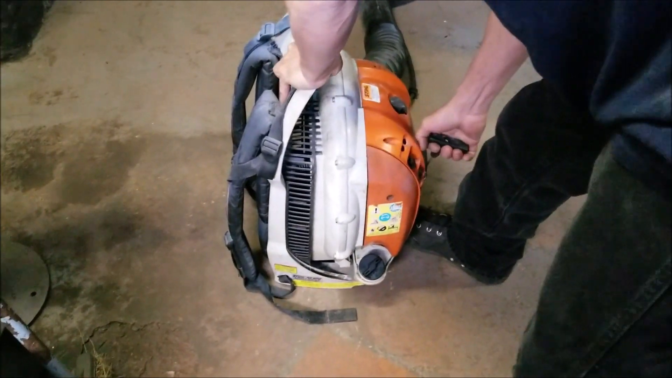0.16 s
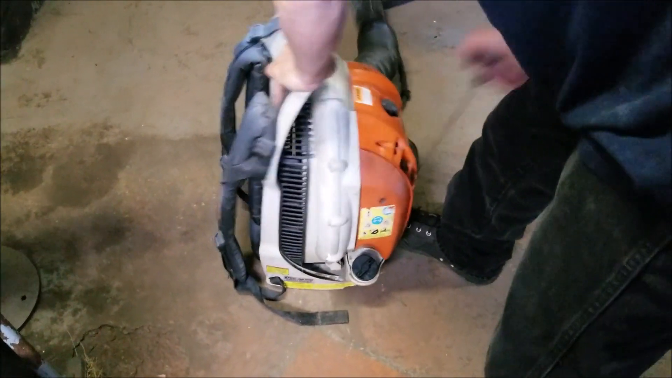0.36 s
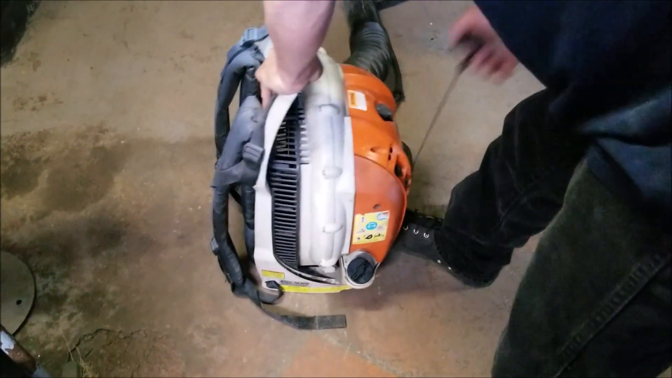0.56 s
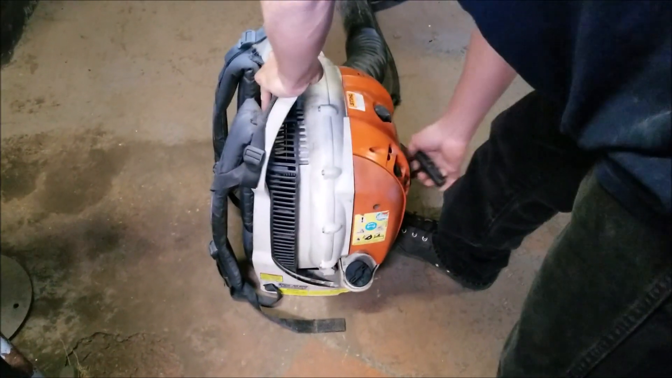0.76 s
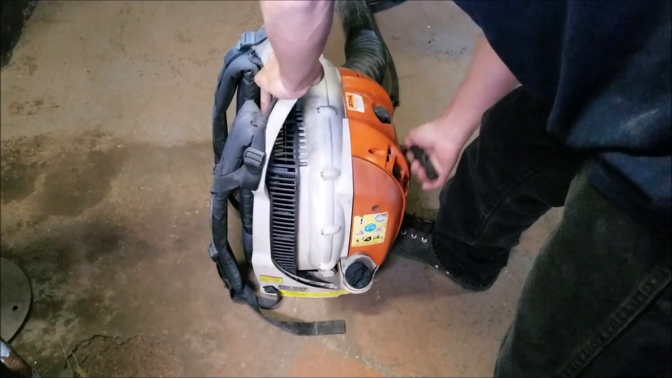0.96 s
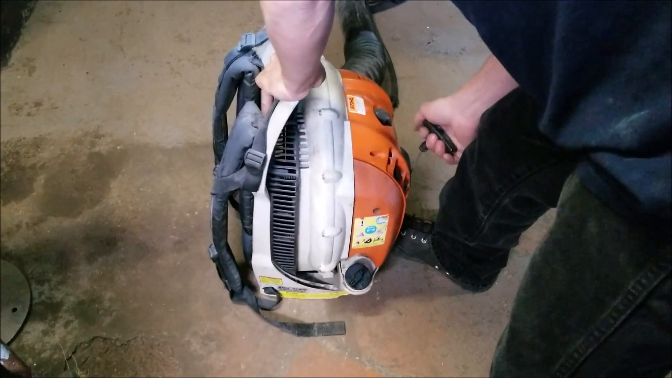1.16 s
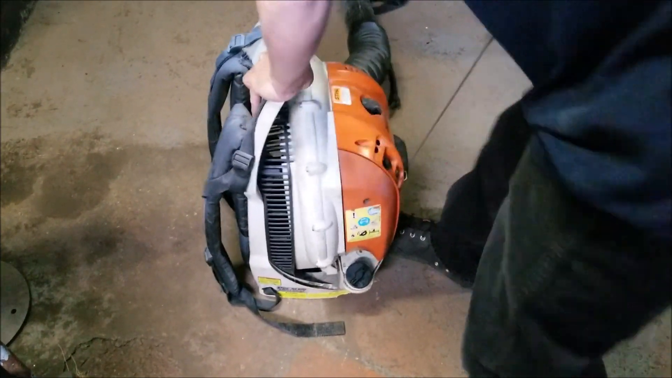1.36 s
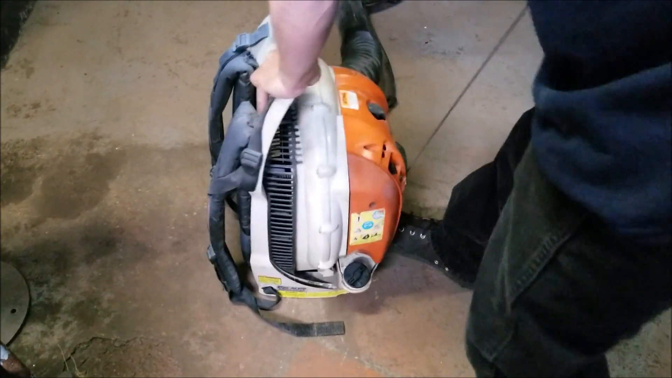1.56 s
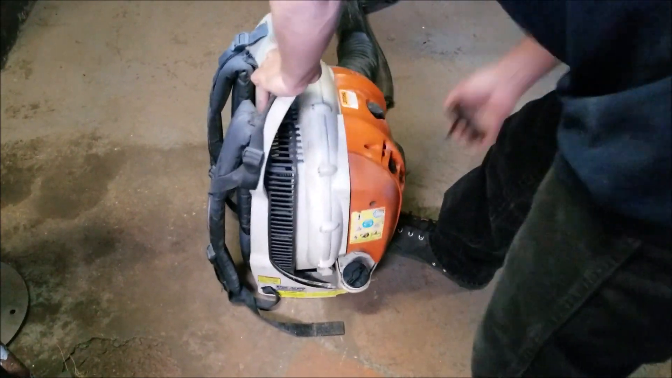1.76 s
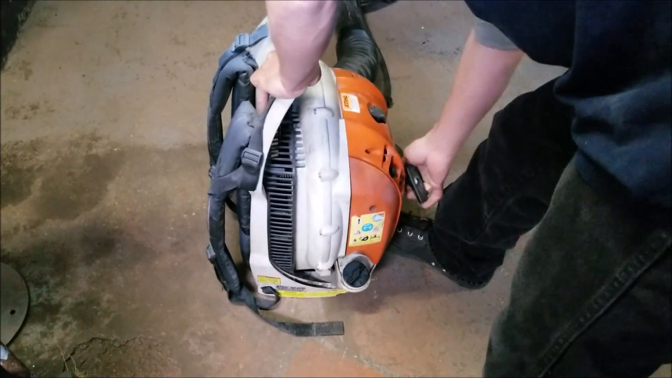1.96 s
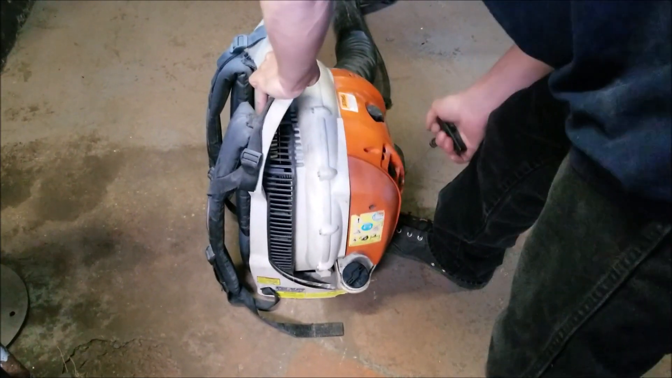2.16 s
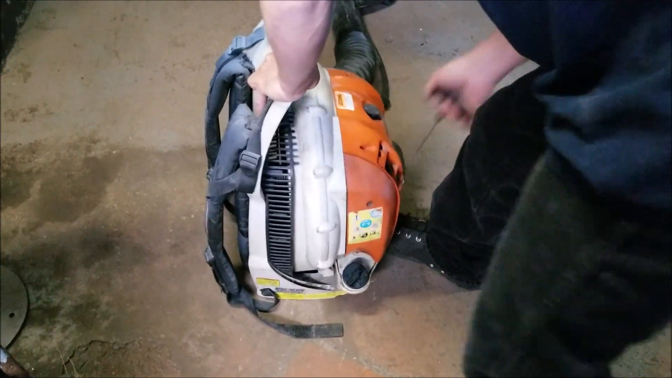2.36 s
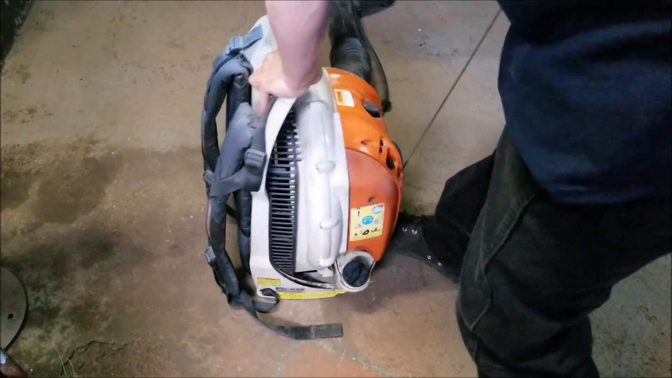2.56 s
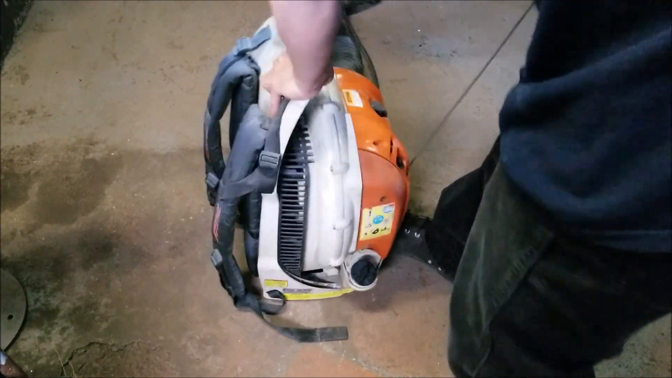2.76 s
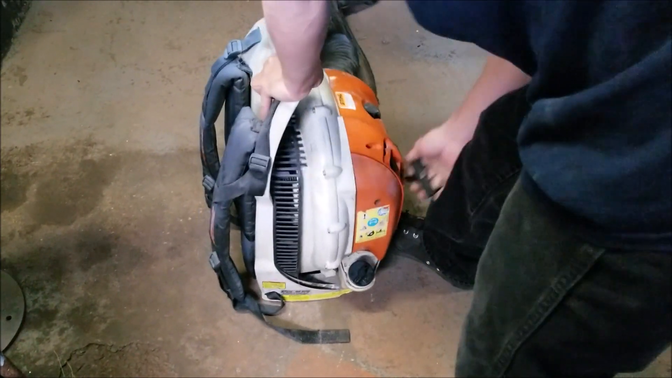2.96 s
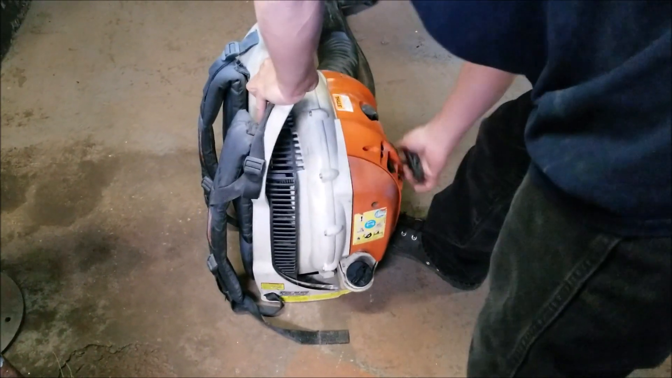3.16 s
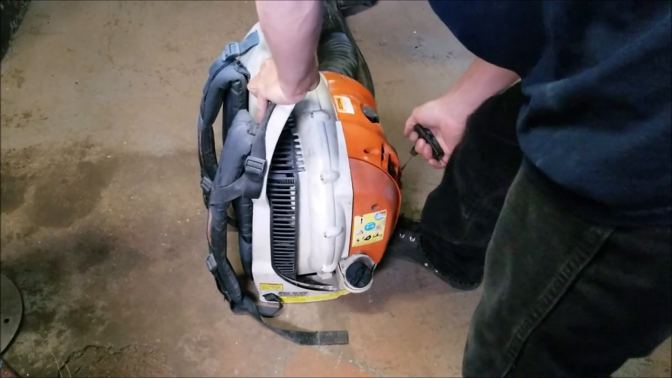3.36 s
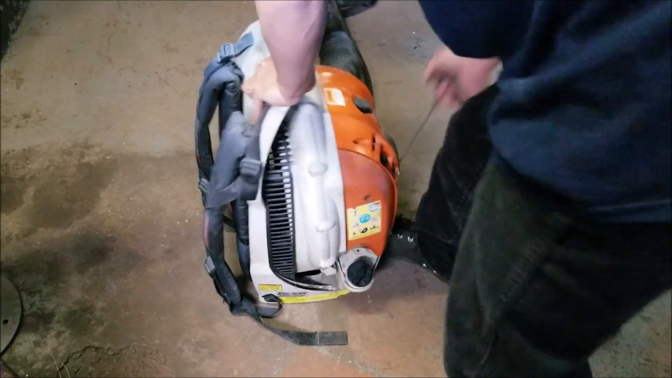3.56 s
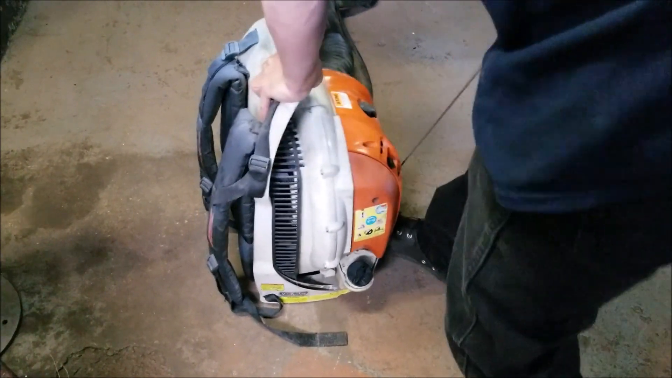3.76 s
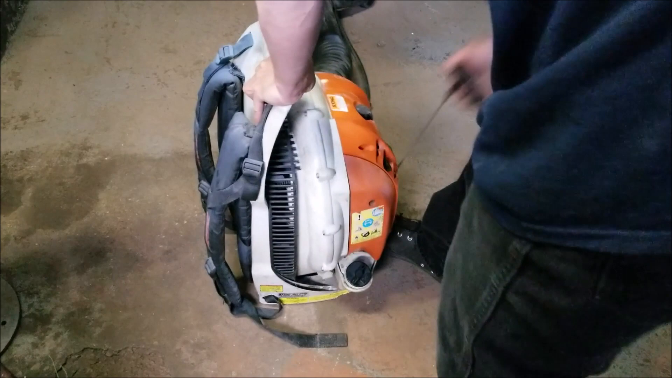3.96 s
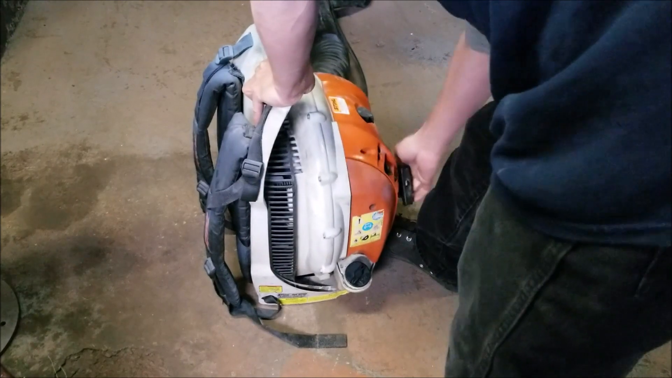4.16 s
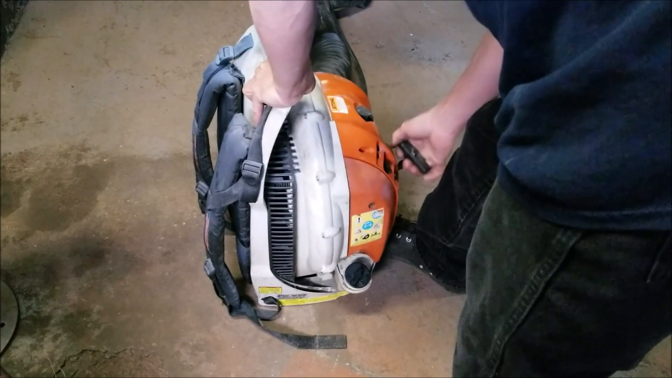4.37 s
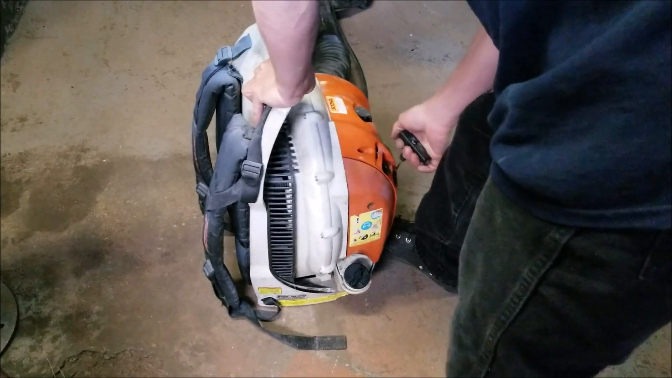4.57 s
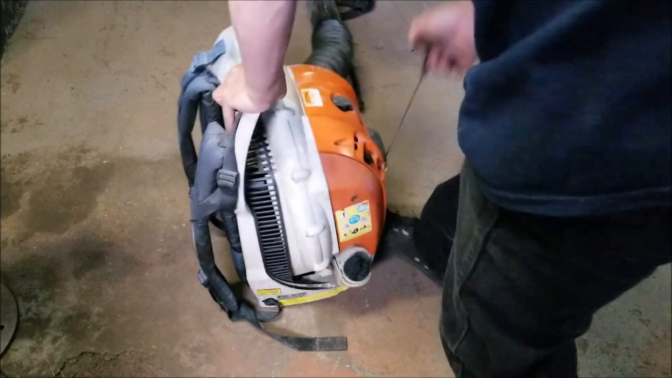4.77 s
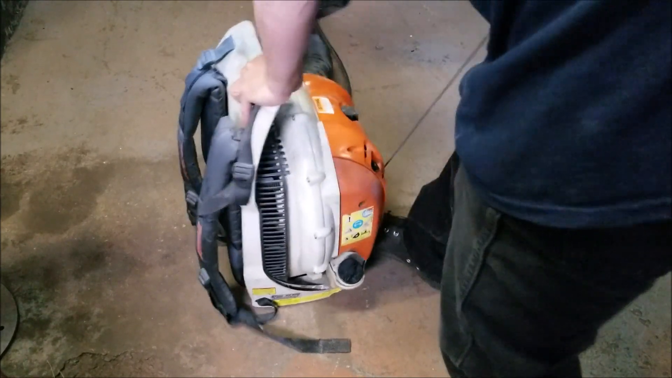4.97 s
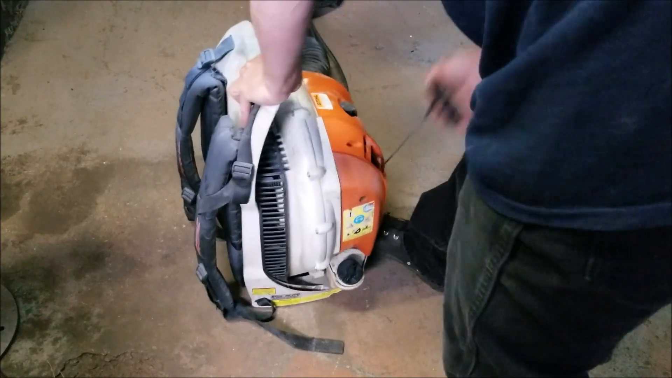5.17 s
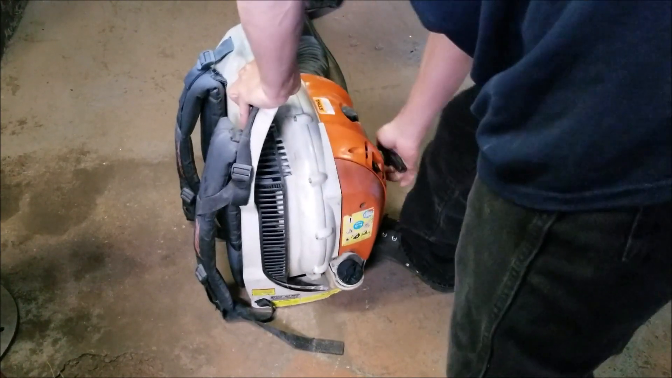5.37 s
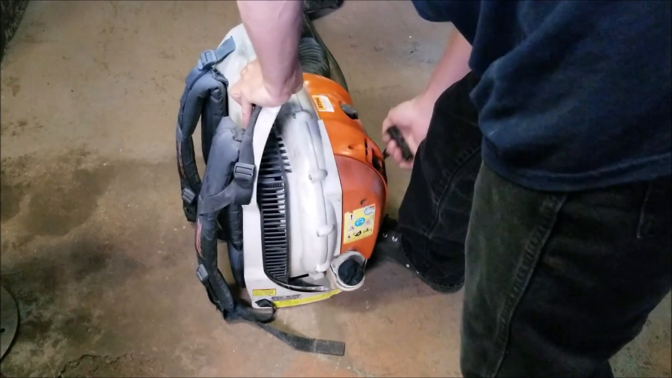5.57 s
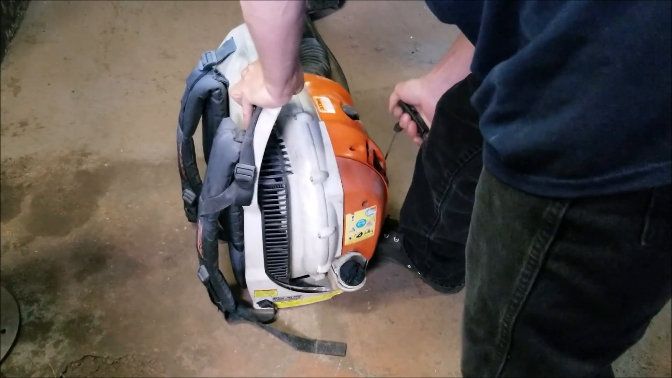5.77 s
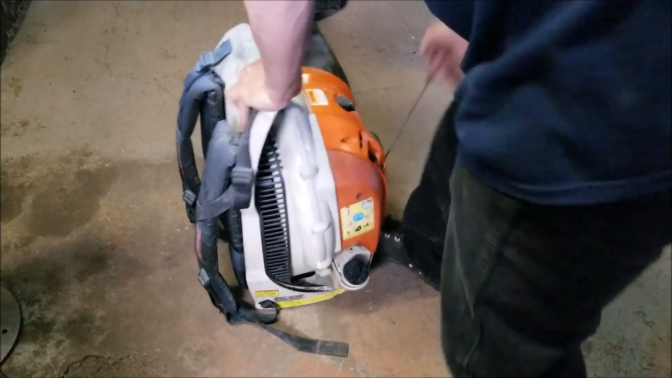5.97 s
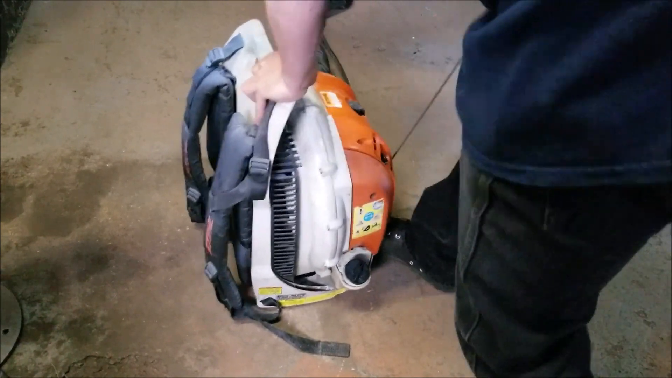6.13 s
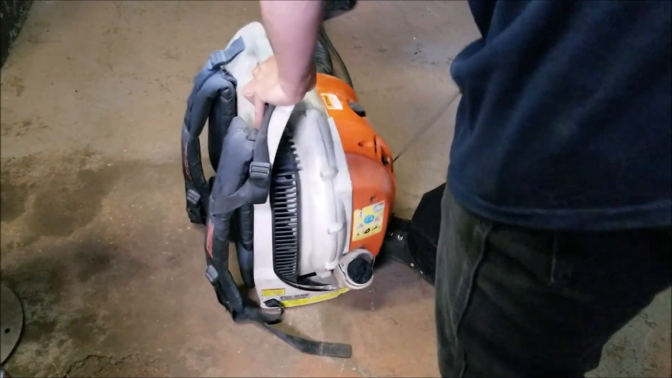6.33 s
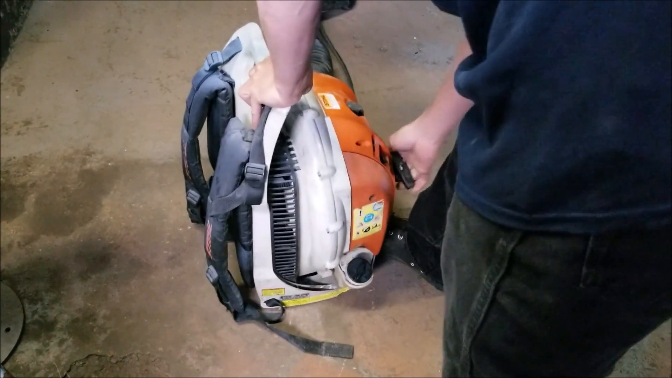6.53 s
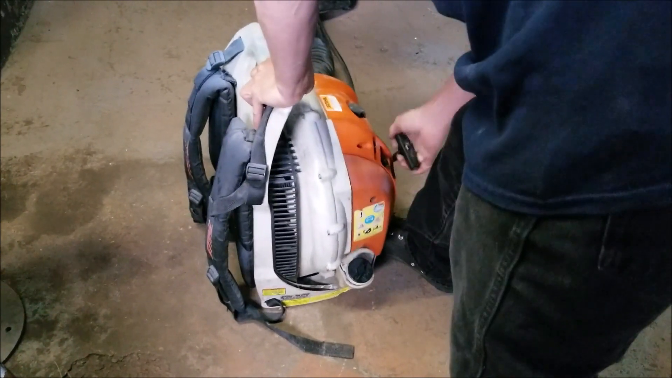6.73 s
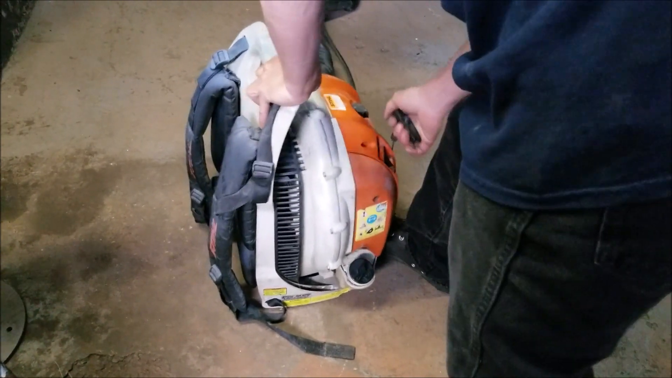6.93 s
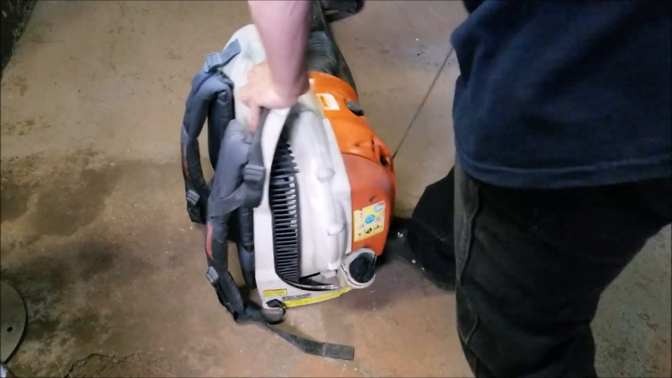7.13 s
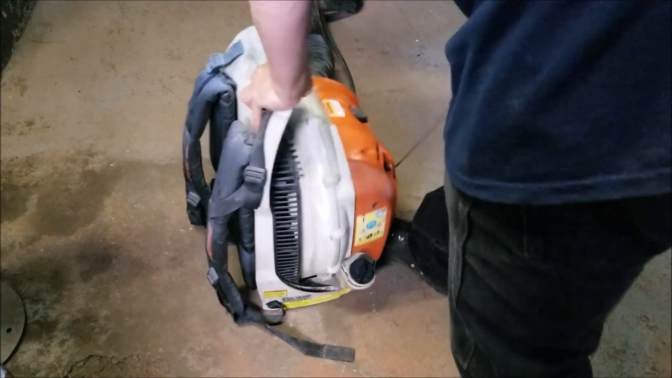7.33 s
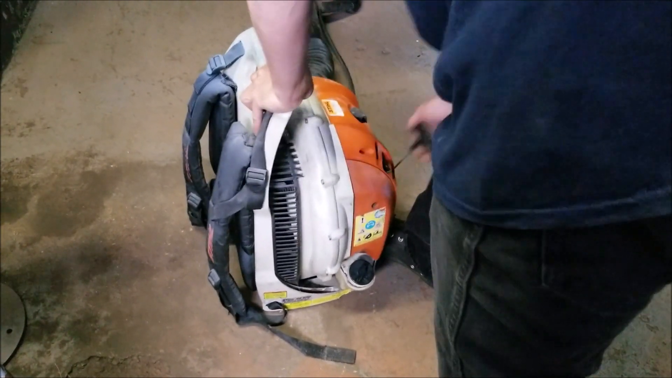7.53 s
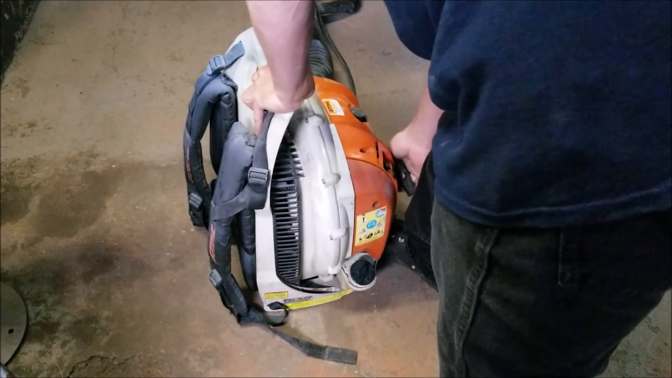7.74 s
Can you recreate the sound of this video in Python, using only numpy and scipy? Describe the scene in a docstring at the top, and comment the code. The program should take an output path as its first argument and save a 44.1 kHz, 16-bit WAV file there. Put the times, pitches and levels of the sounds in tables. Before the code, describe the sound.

In a hard-walled workshop, the starter cord of a two-stroke backpack blower is pulled seven times, about once a second. Each pull opens with a hollow clunk and a low gulp of air, then the cord rasps out while the piston knocks the plastic housing. The fan coasts as the cord rewinds, and the handle usually bumps home. The engine never fires. It sits slightly left of the microphone.

```python
"""A hard-walled workshop; a two-stroke backpack blower stands a little left of the microphone.
Its recoil starter is pulled seven times. A pull opens with the clunk of the pawls and a gulp of air;
then the cord rasps off its pulley while the piston knocks the plastic housing and small parts clack.
The fan coasts as the spring rewinds the cord, the handle bumps home and the cavities hum on.
The walls ring briefly, down to a faint hush. The engine never fires."""
import sys
import numpy as np
from scipy import signal
from scipy.fft import rfft, irfft, next_fast_len
from scipy.io import wavfile
from scipy.ndimage import map_coordinates

SR = 44100
rng = np.random.default_rng(int(sys.argv[2]) if len(sys.argv) > 2 else 0)


def master(y):
    """Save y as 16-bit WAV."""
    cut = np.clip(np.atleast_2d(y).T, -1, 1)
    pcm = np.round(cut * 32767)  # scale
    wavfile.write(sys.argv[1], SR, pcm.astype(np.int16))


N = 343980

# The pulls. Each row: start of the cord's run, slack time before it, stroke length and rewind length
# in seconds, then cord rasp, fan whirr, and the low and high note of the first gulp in dB.
PULLS = [(.336, .002, 0.13, 0.3, -38, -35, -37.5, -44), (1.403, .118, .19, .51, -29.5, -31.5, -28, -25),
         (2.488, 0.06, .23, 0.56, -32, -31, -35, -45), (3.677, .138, .17, .52, -31.5, -31.5, -30.5, -25),
         (4.779, .008, .17, .53, -32, -32, -38, -46), (6.046, 0.12, 0.18, 0.59, -30, -30, -23.5, -45),
         (7.105, 0.13, 0.2, .49, -32.5, -29.5, -32.5, -54)]
# Pawls catching the flywheel. Each row: start in seconds, level in dB, relative treble in dB,
# favoured ring in Hz.
PAWL_CATCHES = [(0.336, -11.5, -16, 584), (1.275, -17.5, -19, 536), (2.488, -22, -7, 666),
                (3.531, -17.5, -32, 684), (4.777, -13.5, -18, 672), (5.922, -18, -21, 692),
                (6.979, -24, -37, 602)]
# The piston's hardest jolts. Each row: start in seconds, level in dB.
PISTON_KNOCKS = [(0.484, -14), (0.666, -27), (1.495, -14.5), (1.529, -15.5), (1.754, -30.5), (1.904, -30),
                 (2.609, -21), (2.667, -17), (3.074, -27.5), (3.862, -24), (4.021, -22), (4.164, -29),
                 (4.831, -13.5), (4.996, -19.5), (5.16, -23), (5.256, -29), (6.165, -17), (6.229, -18),
                 (6.36, -20.5), (7.456, -17.5), (7.561, -27.5)]
# The handle bumping home. Each row: start in seconds, level in dB, favoured ring in Hz.
HANDLE_BUMPS = [(1.001, -19, 830), (2.067, -28, 704), (3.244, -28.5, 578), (4.34, -23, 680),
                (5.631, -35.5, 1173), (6.736, -17.5, 636)]
# The sharpest clacks of the starter's small parts. Each row: start in seconds, level in dB.
SHARP_CLACKS = [(0.2527, -41.5), (0.4244, -30.5), (1.2764, -24.5), (1.506, -18.5), (2.3468, -45.5),
                (2.4295, -31), (2.5865, -19.5), (2.6804, -23), (3.6353, -19), (3.6887, -18.5),
                (3.7736, -22.5), (3.8761, -26), (3.935, -27), (6.1438, -19), (6.4788, -29), (6.829, -26.5)]
# Slow piston strokes later in a pull. Each row: crest in seconds, low note in dB, high note in dB.
LATE_GULPS = [(0.416, -36, -20), (1.547, -29.5, -30.5), (2.794, -24.5, -27.5), (2.88, -35, -33),
              (4.124, -35, -33.5), (4.901, -23.5, -28.5), (7.225, -32.5, -31.5), (7.578, -37, -38)]
# Bright whips of the cord against its guide, and the frame rocking. Each row: start in seconds, level in dB.
BRIGHT_CLICKS = [(0.4833, -19), (0.7196, -25.5), (1.328, -20), (3.5808, -18.5)]
FRAME_THUMPS = [(.375, -30), (1.49, -39), (4.825, -34)]
# One squeal of the rewinding cord: crest and half length in seconds, pitch and width in Hz, level in dB.
CORD_SQUEAL = (5.13, .1, 13500, 350, -51)
# The blower's resonances. Each row: frequency in Hz, width in Hz, level in dB.
HOUSING_MODES = [(585.5, 39, -2), (685.4, 78, 6), (772, 185, -5.5), (904, 55, -2), (1226, 89, -2.5),
                 (1322, 55, -0.5), (1416, 65, -0.5), (1690, 46, -3.5), (1890, 75, 0), (2525, 270, -6)]  # the plastic shell
CAVITY_MODES = [(64.6, 26, -30.5), (89, 6, -7.5), (171, 17.6, -5), (211.7, 21, -2), (273.6, 8.7, -2),
                (327.5, 15.6, -1.5), (479, 64, -8.5)]  # the air box and the hollows under the cover
# Noise spectra. Each row: frequency in Hz, relative level in dB.
RASP_SPECTRUM = [(300, -2), (900, -12), (2000, 8.5), (4000, 6.5), (5200, -0.5), (6400, 5.5), (7800, -4),
                 (11500, 2), (13800, -8), (15800, -11)]  # cord in its guide
CLACK_SPECTRUM = [(300, -11.5), (900, 3), (2500, 4), (4800, -3.5), (6600, 2), (8000, -4.5), (11500, 1),
                  (13800, -8), (15800, -7.5)]  # small hard parts
CRACK_SPECTRUM = [(400, -29), (1500, -24), (3000, 11), (5000, 8), (6800, 4.5), (15800, -6)]  # the contact of a blow
PANEL_SPECTRUM = [(25, -42), (100, -10.5), (400, -7), (650, -0.5), (1050, -5), (1500, -4.5), (2500, -11.5),
                  (5000, -25.5), (12000, -23.5)]  # loose panels
ROOM_TONE_SPECTRUM = [(25, -21.5), (70, -4), (170, -4), (330, -4.5), (700, -16.5), (2000, -28.5),
                      (6000, -40), (15000, -40)]  # the quiet workshop
# The stereo image at the microphone. Each row: frequency in Hz, left-right correlation.
STEREO_LIKENESS = [(100, 0.87), (300, 0.95), (650, 0.64), (1200, 0.14), (8000, 0.029)]
# The ring of the walls. Each row: frequency in Hz, seconds to fall 60 dB.
WALL_T60 = [(150, 0.71), (1000, 0.45), (5000, 0.56), (15000, 0.17)]

SPIN_UP_S = .037  # from the start of the run to top speed
TURNS_PER_S, TURN_KNOCK_DB = 19, -27.5  # the crank at top speed, and the knock of each compression
JERK_DB, REBOUND_S = -17, .035  # the piston gives way with a double knock
CLACKS_PER_S, CLACK_DB = 36, -29.5  # small parts at top speed
TICK_LEAD_S, TICK_DB = 0.0114, -16  # the handle ticks on its guide before the bump, and softer
AIR_BOX_NOTES_HZ = (172, 274)
GULP_LEAD_S, FIRST_GULP_HALF_S, LATE_GULP_HALF_S = 0.069, 0.047, 0.029  # first crest leads the run
TOP_HZ = 16000


def knocks():
    """The pawls catch with a hollow clunk, the piston jolts the housing, the soft handle bumps home."""
    pawls = blows(*np.transpose(PAWL_CATCHES),
                  focus_db=6.5, ring_db=4.5, thud_db=-5.5, t60=0.041, rise=0.00248)
    s, db, hz = np.transpose(HANDLE_BUMPS)
    handle = blows(s, db, treble_db=-20.5, centre_hz=hz,
                   focus_db=6, ring_db=5, thud_db=-9.0, t60=0.092, rise=.0016)
    piston = blows(*piston_jolts(), treble_db=-14, centre_hz=660,
                   focus_db=2.0, ring_db=1.5, thud_db=-4.5, t60=0.05, rise=.0011)
    return pawls + piston + handle


def piston_jolts():
    """Times and levels of the piston's knocks: a pair as it gives way, one each turn, a few hard ones."""
    s, db = crank_contacts(TURNS_PER_S, scatter=.2, fade_db=-16.5)
    jerks = [(run + delay, JERK_DB) for run, *_ in PULLS for delay in (0, REBOUND_S)]
    return np.transpose([*jerks, *PISTON_KNOCKS, *zip(s, db + TURN_KNOCK_DB)])


def blows(s, db, treble_db, centre_hz, focus_db, ring_db, thud_db, t60, rise):
    """Each blow shakes the loose panels, cracks at the contact and rings the housing."""
    thud = filtered(decays(s, db + thud_db, t60, rise) * noise(), colour(PANEL_SPECTRUM))
    crack = filtered(decays(s, db + treble_db, t60=0.037, rise=rise) * noise(), colour(CRACK_SPECTRUM))
    ring = housing_ring(s, db + ring_db, rise, np.broadcast_to(centre_hz, s.shape), focus_db)
    return ring + thud + crack


def housing_ring(times, levels_db, rise, centres_hz, focus_db):
    """The housing's modes, struck anew by every blow; where it lands favours those near one pitch."""
    hz, width, db = np.transpose(HOUSING_MODES)[:, :, None]
    t = np.arange(SR // 8) / SR
    envelope = np.exp(-np.pi * width * t) * (1 - np.exp(-t / rise))
    pair = np.zeros((2, N + SR))
    for s, level, centre in zip(times, levels_db, centres_hz):
        size, detune = rng.standard_normal((2, len(hz), 1))
        strength = amp(db + 2 * size - focus_db * abs(np.log2(hz / centre)))
        cycles = hz * (1 + 0.017 * detune) * t + rng.random((len(hz), 1))
        # high modes reach the microphone's two sides further apart in phase
        skew = hz / 7000 * rng.standard_normal((2, len(hz), 1))
        modes = strength / np.linalg.norm(strength) * envelope * np.sin(2 * np.pi * (cycles + skew))
        start = round((s - rise / 2) * SR)
        pair[:, start:start + len(t)] += amp(level) * modes.sum(axis=1)
    return pair[:, :N]


def cord_and_fan():
    """The cord rasps through its guide in small slips; pulley and fan rattle the shell and stir its air."""
    cord = sum(amp(db) * stroke(timing, slack_db=-9.5, wound_db=-44.5) for *timing, db, _, _, _ in PULLS)
    fan = sum(amp(db) * stroke(timing, slack_db=-8.0, wound_db=-21.5) for *timing, _, db, _, _ in PULLS)
    rasp = cord * chatter(rate=260, scatter_db=4.5, t60=0.077) * noise()
    rattle = fan * chatter(rate=110, scatter_db=5, t60=0.077)
    stir = amp(-15) * fan ** 0.75 * noise()  # the cavities keep rumbling as the fan slows
    shell = amp(-4.5) * filtered(rattle * noise(), resonant(HOUSING_MODES))
    panels = amp(-6.5) * filtered(rattle * noise(), colour(PANEL_SPECTRUM))
    return filtered(rasp, colour(RASP_SPECTRUM)) + shell + panels + filtered(stir, resonant(CAVITY_MODES))


def stroke(pull, slack_db, wound_db):
    """Gain through one pull: low while the slack goes, full on the run, sinking as the cord winds back."""
    run, slack, length, rewind, *_ = pull
    wound = run + length + rewind
    knots = np.sort([run - slack - .01, run - slack, run, run + SPIN_UP_S,
                     run + length, wound, wound + .12])
    t = np.arange(N) / SR
    db = np.interp(t, knots, [-60, slack_db, slack_db, 0, 0, wound_db, -60])
    return amp(db) * (t > knots[0])


def crank_contacts(rate, scatter, fade_db):
    """Times and levels of contacts, rate a second at top speed, sparser and softer as the crank slows."""
    speed = sum(stroke(pull, slack_db=-20, wound_db=-14) for pull in PULLS)
    count = np.cumsum(speed) * rate / SR
    late, size = rng.standard_normal((N // 1000, 2))[:int(count[-1])].T
    due = np.arange(len(late)) + 1 + scatter * late
    at = np.minimum(np.searchsorted(count, due), N - 1)
    return at / SR, fade_db * (1 - speed[at]) + 2.1 * size


def clacks():
    """Small hard parts snap together and buzz briefly while the pulley turns and as the handle lands."""
    s, db = crank_contacts(CLACKS_PER_S, scatter=.4, fade_db=-26)
    ticks = [(home - TICK_LEAD_S, level + TICK_DB) for home, level, _ in HANDLE_BUMPS]
    s, db = np.transpose([*SHARP_CLACKS, *ticks, *zip(s, db + CLACK_DB)])
    snap = decays(s, db + 1.5, t60=0.022, rise=0.0016)
    buzz = decays(s, db - 6.5, t60=0.052, rise=0.0013)
    return filtered(np.hypot(snap, buzz) * noise(), colour(CLACK_SPECTRUM))


def air_gulps():
    """Slow piston strokes swell the air box's two wavering notes, with turbulent air around them."""
    t = np.arange(N) / SR
    drift = 0.49 * wobble(rate=55)
    first = [(run - GULP_LEAD_S, FIRST_GULP_HALF_S, (low, high)) for run, *_, low, high in PULLS]
    later = [(s, LATE_GULP_HALF_S, levels) for s, *levels in LATE_GULPS]
    notes, flow = np.zeros(N), np.zeros(N)
    for s, half, levels in first + later:
        near = abs(t - s) < 4 * half
        swell = np.exp(-abs((t[near] - s) / half) ** 3)
        for hz, db in zip(AIR_BOX_NOTES_HZ, levels):
            phase = 2 * np.pi * (hz * t[near] + rng.random()) + drift[near]
            notes[near] += amp(db) * swell * np.sin(phase)
        flow[near] += np.linalg.norm(amp(levels)) * swell
    hollow = amp(-8.0) * filtered(flow * noise(), resonant(CAVITY_MODES))
    puff = amp(-10.0) * filtered(flow * noise(), colour(PANEL_SPECTRUM))
    flutter = amp(1.4 * wobble(rate=76))
    return amp(-0.5) * notes * flutter + hollow + puff


def bright_clicks():
    """Short, bright whips of the cord against its guide."""
    s, db = np.transpose(BRIGHT_CLICKS)
    clicks = decays(s, db - 3.5, t60=0.026, rise=0.00066)
    return filtered(clicks * noise(), colour([(1200, -28), (5000, 3)]))


def frame_thumps():
    """The hardest yanks rock the whole frame on its feet."""
    s, db = np.transpose(FRAME_THUMPS)
    return filtered(decays(s, db, t60=0.25, rise=0.0082) * noise(), resonant([(83.0, 57, 0)]))


def cavity_hum():
    """The cavities under the cover hum on after the handle has bumped home."""
    s, db, _ = np.transpose(HANDLE_BUMPS)
    return filtered(decays(s + 0.015, db - 21, t60=0.65, rise=0.029) * noise(), resonant(CAVITY_MODES))


def cord_squeal():
    """The rewinding cord slips once with a thin, very high whistle."""
    s, half, hz, width, db = CORD_SQUEAL
    whistle = unit(filtered(noise(), lambda f: np.exp(-((f - hz) / width * 2) ** 2)))
    swell = np.exp(-((np.arange(N) / SR - s) / half) ** 2)
    return amp(db) * swell * whistle


def workshop(x, tails=3):
    """Floor and walls answer on both sides of the microphone with a shifting tail; its top dies first."""
    turn = np.arange(N) / SR / .014  # the next tail takes over every 14 ms
    answer = np.zeros((2, N))
    for k in range(tails):
        hz, t, spectrum = signal.stft(rng.standard_normal((2, SR * 3 // 4)), SR, nperseg=256)
        fall = amp(-60 * t / along(WALL_T60, hz)[:, None])
        tail = signal.istft(spectrum * fall, SR, nperseg=256)[1]
        tail *= 1 - np.exp(-np.arange(tail.shape[1]) / SR / 0.0012)
        share = np.sin(np.pi / 2 * np.minimum((turn - k) % tails, 2))
        answer += signal.oaconvolve(x * share, tail / np.linalg.norm(tail[0]), axes=1)[:, :N]
    return spread(answer)


def room_tone():
    """The workshop's faint, low hush, steady behind the pulls."""
    return amp(-53.5) * filtered(noise(), colour(ROOM_TONE_SPECTRUM))


def chatter(rate, scatter_db, t60):
    """Envelope, rms 1, of many small contacts at an uneven rate."""
    gap, size = rng.standard_normal((6000, 2)).T
    times = np.cumsum(np.exp(.5 * gap)) / rate
    heard = times < N / SR
    return unit(decays(times[heard], scatter_db * size[heard], t60))


def decays(times, levels_db, t60, rise=0.00041):
    """Envelope of blows that each build up in rise seconds and die away in t60 seconds."""
    starts = np.clip((np.asarray(times) - rise / 2) * SR, 0, N - 1).astype(int)
    power = np.bincount(starts, amp(levels_db) ** 2, N)
    retained = np.exp(-2 * np.log(1000) / (t60 * SR))
    fall = np.sqrt(signal.lfilter([1], [1, -retained], power))
    lag = np.exp(-1 / (rise * SR))
    return signal.lfilter([1 - lag], [1, -lag], fall)


def resonant(modes):
    """Causal response of unit power of (Hz, width, dB) resonances."""
    def response(hz):
        h = sum((-1) ** k * amp(db) * 1j * hz * width / (centre ** 2 - hz ** 2 + 1j * hz * width)
                for k, (centre, width, db) in enumerate(modes))
        return unit(h)
    return response


def colour(points):
    """Causal response of unit power with the shape of a (Hz, dB) spectrum."""
    def response(hz):
        cepstrum = irfft(np.log(amp(along(points, hz))))
        cepstrum[1:len(hz) - 1] *= 2  # folded for minimum phase
        cepstrum[len(hz):] = 0
        return unit(np.exp(rfft(cepstrum)))
    return response


def filtered(x, response):
    """x through a complex response of frequency."""
    size = 2 * next_fast_len(N // 2 + SR // 4)
    return irfft(rfft(x, size) * response(np.fft.rfftfreq(size, 1 / SR)), size)[..., :N]


def spread(pair):
    """Two signals as mid and side, decoded to left and right: alike in the bass, apart in the treble."""
    def weights(hz):
        angle = np.arccos(np.clip(along(STEREO_LIKENESS, hz), -1, 1)) / 2
        return np.array([np.cos(angle), np.sin(angle)])
    mid, side = filtered(pair, weights)
    return np.array([mid + side, mid - side])


def noise():
    """White stereo noise."""
    return spread(rng.standard_normal((2, N)))


def wobble(rate):
    """A smooth random curve, rate knots a second."""
    return map_coordinates(rng.standard_normal(N // 20), [np.arange(N) * rate / SR], mode="wrap")


def along(points, hz):
    """(Hz, value) points read on a log axis."""
    knots_hz, values = np.transpose(points)
    return np.interp(np.log(hz + 1), np.log(knots_hz + 1), values)


def amp(db):
    """Decibels to gain."""
    return 10 ** (np.asarray(db) / 20)


def unit(x):
    """x scaled to rms 1."""
    return x / np.sqrt(np.mean(abs(x) ** 2) + 1e-20)


def scene():
    """The blower a little left of the microphone; its knocks and clacks wake the walls most."""
    spin = cord_and_fan() + cord_squeal()
    hits = knocks() + clacks()
    lows = air_gulps() + frame_thumps() + cavity_hum()
    walls = workshop(amp(-9.5) * spin + amp(-1.5) * hits + amp(-10.5) * lows)
    hush = room_tone()
    lean_left = amp([[1.4], [-1.4]])
    return (spin + hits + bright_clicks() + lows + walls + hush) * lean_left


def record(dry):
    """The microphone passes nothing above TOP_HZ."""
    return filtered(dry, lambda hz: hz < TOP_HZ)


dry = scene()
out = record(dry)
master(out)
```